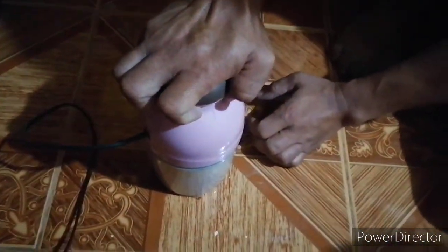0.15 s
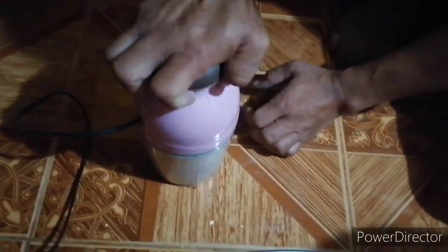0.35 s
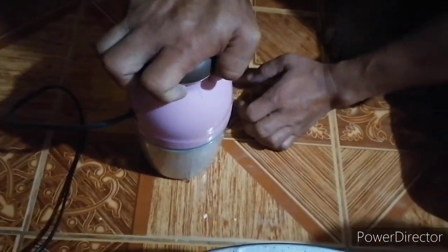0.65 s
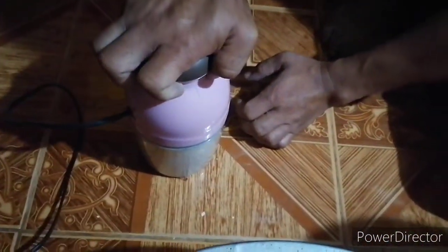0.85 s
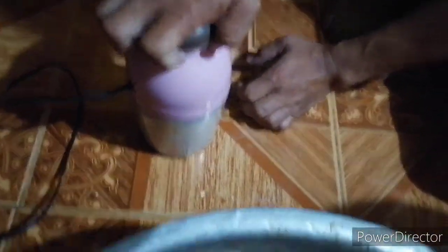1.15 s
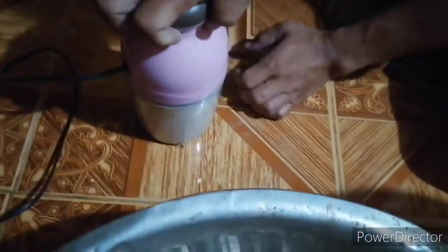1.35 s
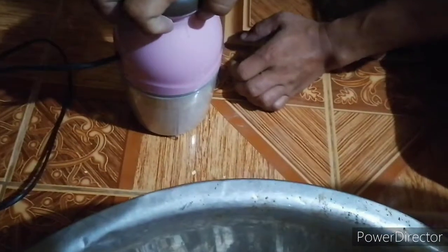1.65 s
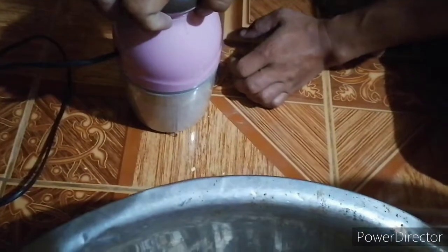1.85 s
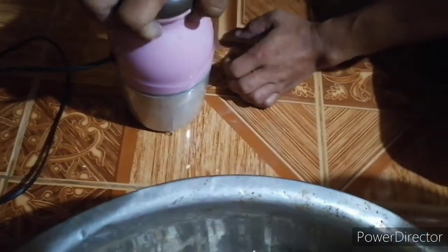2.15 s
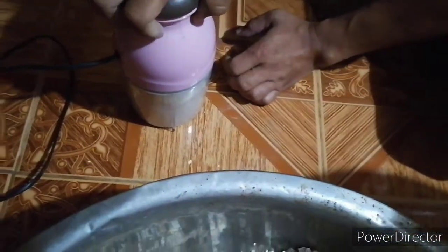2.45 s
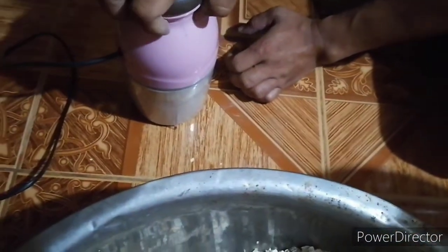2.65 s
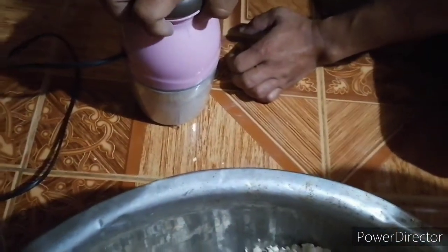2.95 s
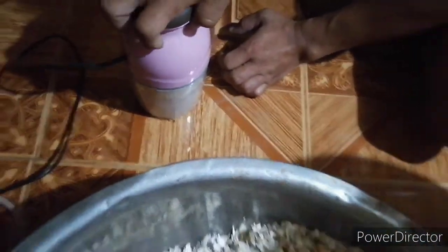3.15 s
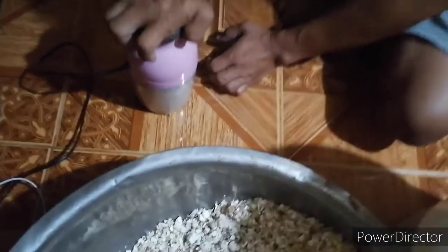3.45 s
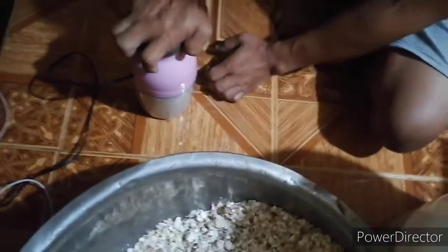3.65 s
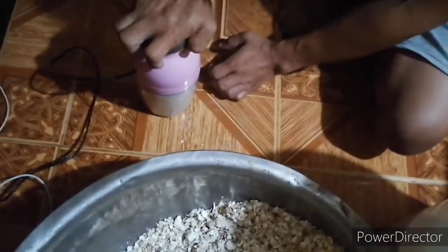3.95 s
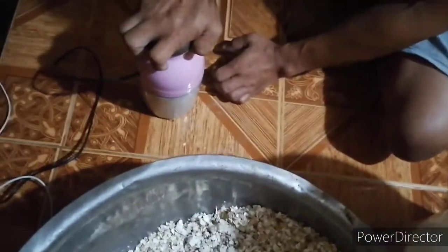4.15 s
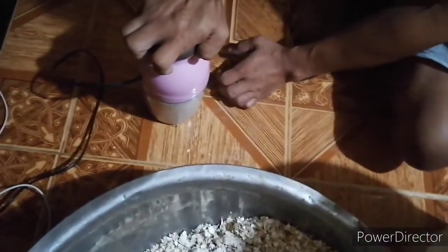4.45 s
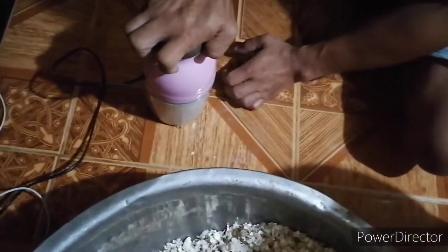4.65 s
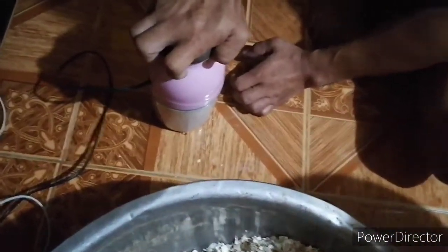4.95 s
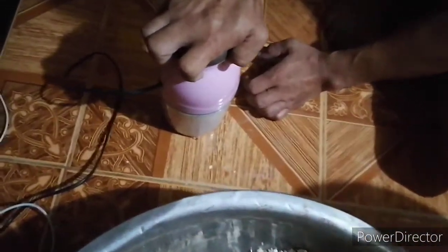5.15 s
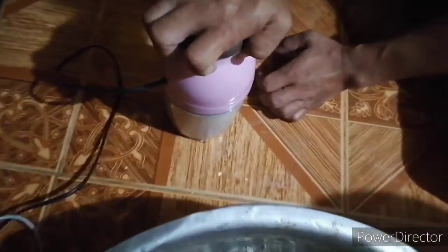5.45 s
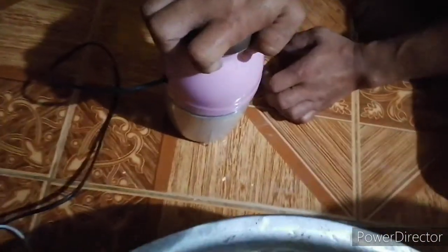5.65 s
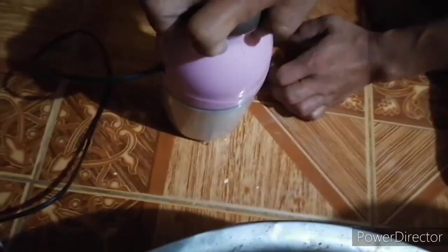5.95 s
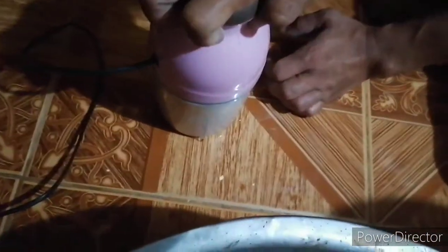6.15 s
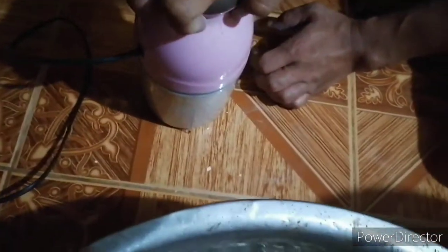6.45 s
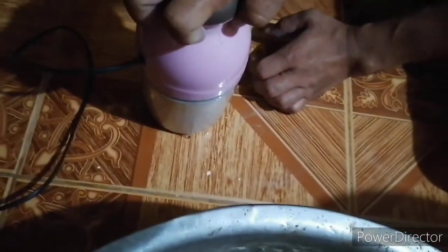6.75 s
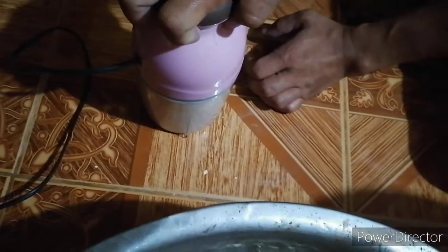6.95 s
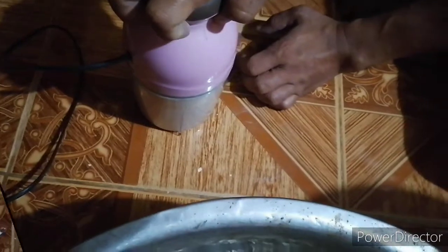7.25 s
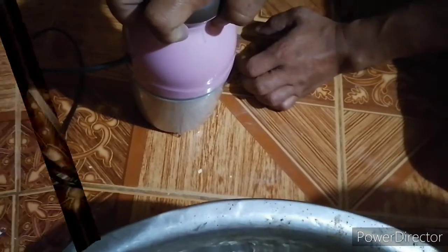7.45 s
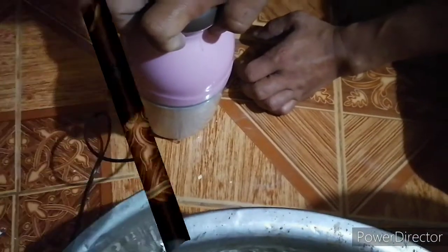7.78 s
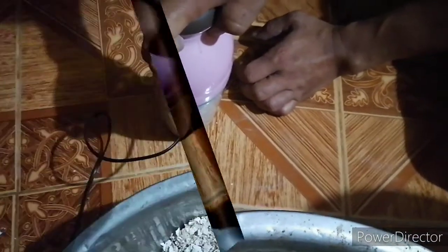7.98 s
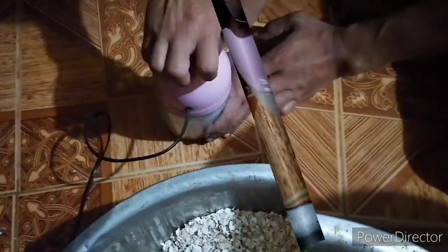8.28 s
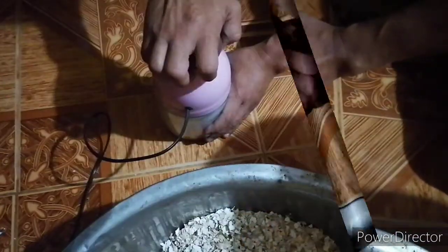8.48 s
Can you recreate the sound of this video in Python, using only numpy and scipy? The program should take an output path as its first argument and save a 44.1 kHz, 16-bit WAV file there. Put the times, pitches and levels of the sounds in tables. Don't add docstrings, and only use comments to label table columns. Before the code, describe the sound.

A small blade grinder rattles harshly with brittle shell bits in two bursts, a quiet pause with faint powder hiss between, then cuts off abruptly.

```python
import sys
import numpy as np
from scipy import signal
from scipy.fft import rfft, irfft, next_fast_len
from scipy.io import wavfile
from scipy.ndimage import uniform_filter1d, minimum_filter1d

SR = 44100
rng = np.random.default_rng(int(sys.argv[2]) if len(sys.argv) > 2 else 0)


def boost_factor(decibels):
    exponent = np.asarray(decibels, float) / 20
    return 10 ** exponent


def file_out(sig):
    cols = np.atleast_2d(sig).T
    lim = np.clip(cols, -1, 1)
    pcm = np.round(lim * 32767).astype(np.int16)
    wavfile.write(sys.argv[1], SR, pcm)


N = 380141
SIZE = next_fast_len(N + SR)
HZ = np.maximum(np.arange(SIZE // 2 + 1) * SR / SIZE, 1)
SWITCH_OFF_S, SWITCH_ON_S = 2.325, 3.3125

# time_s [s], rattle_db [dB], left_right_db [dB]
NEARNESS = [
    (0, -33.5, -1),
    (1.3, -33, -1.5),
    (2.3, -33, -1.5),
    (3.45, -36, -1.5),
    (4.2, -37, -2.5),
    (4.75, -35, -2.5),
    (6.3, -33.5, -2.5),
    (6.6, -33.5, -2.5),
    (8.2, -33.5, -3.5),
]


def grinder():
    near_db, pan_db = in_time(NEARNESS)
    colour_db = cup_colour()
    cracks = knocks(colour_db)
    cup = cracks + tumbling_load(colour_db, near_db)
    sides = np.array([[.5], [-.5]])
    return microphones(room(cup) + cracks) * boost_factor((pan_db + 3.5) * sides)


# pitch_hz [Hz], level_db [dB per Hz]
RATTLE = [(18, -60), (30, -45), (69, -30), (113, -13.5), (396, -11), (463, -4), (759, -5), (1040, -5),
          (1460, -5), (2100, 0), (3100, -4.5), (4580, -7), (6960, -6), (9260, -9.5), (15200, -10)]
# pitch_hz [Hz], width_hz [Hz], lift_db [dB]
RESONANCES = [(309, 7, 8), (461, 16, 2), (510, 20, -1), (595, 43, 4), (644, 15, 2.5), (374, 31, -0.5),
              (564, 16, -1.5), (757, 35, -6), (1870, 35, 1), (1042, 250, 4.5), (2137, 52, 2),
              (2630, 96, 2.5), (3097, 510, 6), (5790, 1600, 7.5), (7100, 680, 9.5), (1020, 7.9, 4.5)]


def cup_colour():
    colour_db = at_hz(RATTLE)
    for hz, width_hz, lift_db in RESONANCES:
        colour_db = colour_db + lift_db / (1 + (2 * (HZ - hz) / width_hz) ** 2)
    return colour_db


# start_s [s], peak_db [dB]
KNOCKS = [
    (0.1037, -21),
    (1.0544, -22),
    (3.3134, -31.5),
    (3.345, -28),
    (3.4136, -24),
    (3.4674, -25),
    (3.7504, -24),
    (7.2888, -22),
]


def knocks(colour_db):
    pushes = np.zeros(N)
    starts = [round(start_s * SR) for start_s, _ in KNOCKS]
    pushes[starts] = boost_factor(np.array(KNOCKS)[:, 1] + 6.5)
    return shaped(pushes, rms_one(boost_factor(colour_db)))


# time_s [s], lift_db [dB]
SURGES = [(.1, 1), (1.0, 2), (1.63, 2), (3.42, 1), (3.49, -1), (3.77, 1.5), (4.61, 2.5), (6.72, 1.5),
          (7.37, 1.5), (7.87, 1.5), (8.15, 2.5)]


def tumbling_load(colour_db, near_db):
    surge_half_s = 0.024
    bite_db, bite_s = -5, .05
    boom_db, dust_db = -10.5, -11
    boom_follows, dust_follows = .1, .1
    low = 1 / (1 + (HZ / 1600) ** 6)
    high = 1 / (1 + (8300 / HZ) ** 12)
    surge_db = sum(lift_db * hump(s, surge_half_s) for s, lift_db in SURGES)
    t = np.arange(N) / SR
    running = (t < SWITCH_OFF_S) | (t > SWITCH_ON_S)
    load_db = near_db + bite_db * np.exp(-np.abs(t - SWITCH_ON_S) / bite_s)
    swell = drift(48)
    layers = [(low, load_db + boom_db + boom_follows * surge_db, 2.5, 1.2),
              (1 - low - high, load_db + surge_db, 3.5, 1.8),
              (high, load_db + dust_db + dust_follows * surge_db, 3.0, 1.8)]
    load = 0
    for share, level_db, spread_db, clump_db in layers:
        body = rms_one(boost_factor(colour_db) * np.sqrt(np.clip(share, 0, 1)))
        load = load + shaped(fragments(level_db + 0.5, running, spread_db, clump_db, swell), body)
    return load


def fragments(level_db, running, spread_db, clump_db, swell):
    hits_per_s = 5000
    sizes = boost_factor(spread_db * np.minimum(rng.exponential(1, N), 4.0)) * rng.choice([-1, 1], N)
    hits = rms_one(sizes * (rng.random(N) < hits_per_s / SR))
    clumps = swell + 0.3 * drift(31.0) + 0.92 * drift(80)
    clumps -= uniform_filter1d(clumps, size=SR // 7)
    return hits * running * boost_factor(level_db + clump_db * 1.09 * np.tanh(clumps / 1.2))


HOP, SHORT = 768, 16384
SHORT_HZ = np.maximum(np.arange(SHORT // 2 + 1) * SR / SHORT, 1)
# pitch_hz [Hz], decay_s [s]
ROOM_T60 = [(100, .24), (600, .25), (1300, .25), (2200, .39), (3300, .26), (5500, .24), (12000, .22)]


def room(x):
    direct_db = -7
    t = np.arange(SHORT - 2 * HOP) / SR
    centres = 100 * 2 ** np.arange(0, 8, .75)
    decays = boost_factor(-60 * t / at_hz(ROOM_T60, centres)[:, None]) * (t > .004)
    decays /= np.sqrt(np.sum(decays ** 2, axis=1, keepdims=True))
    bands_away = np.log2(np.maximum(SHORT_HZ, 100) / centres[:, None]) / .75
    shares = np.cos(np.pi / 2 * np.clip(bands_away, -1, 1))
    spots = []
    for noise in rng.standard_normal((40, 2, 2, len(t))):
        tails = sum(rfft(noise[k % 2] * decays[k], SHORT) * shares[k] for k in range(len(centres)))
        spots.append(pair(*tails, SHORT_HZ) + boost_factor(direct_db))
    run_in = 12 * HOP
    padded = np.pad(x, (run_in, 2 * HOP), "reflect")
    fade = np.sin(np.pi * np.arange(2 * HOP) / (2 * HOP))
    out = np.zeros((2, N + 2 * SHORT))
    for k, start in enumerate(range(0, N + run_in, HOP)):
        piece = rfft(padded[start:start + 2 * HOP] * fade, SHORT)
        out[:, start:start + SHORT] += irfft(piece * spots[k % 40], SHORT)
    return out[:, run_in:run_in + N]


# pitch_hz [Hz], left_right_db [dB]
TILT = [(60, -11), (120, 2), (240, -1.5), (480, 4), (950, -1.5), (1890, -4), (3770, -6), (7520, -0.5),
        (15000, -1.5)]
# pitch_hz [Hz], lead_rad [radians]
LEAD = [(0, 0), (950, .9), (1210, 1.2), (3010, 10.0), (7060, 25.5), (16000, 56)]


def microphones(x):
    sides = np.array([[.5], [-.5]])
    lead_rad = np.interp(HZ, *np.transpose(LEAD))
    return shaped(x, boost_factor(at_hz(TILT) * sides) * np.exp(1j * lead_rad * sides))


# pitch_hz [Hz], level_db [dB per Hz]
HISS_COLOUR = [(4300, -41), (5000, -17), (5700, -22), (6500, -6.5), (7050, -1), (7900, -11), (9500, -16.5),
               (12000, -19), (15200, -21.5)]


def powder_hiss():
    peak_s, peak_db = 3.1, -49.5
    rise_s, sag_db, sag_s = .052, 5, .07
    since = np.arange(N) / SR - peak_s
    rise = -10 * (since / rise_s) ** 2
    sag = -sag_db * (1 - np.exp(-np.abs(since) / sag_s))
    level_db = peak_db + np.where(since < 0, rise, sag)
    before_blade = since < SWITCH_ON_S - peak_s
    return wide_noise(HISS_COLOUR) * boost_factor(level_db + 4.5 + 1.3 * drift(44)) * before_blade


# time_s [s], level_db [dB], half_length_s [s]
BUMPS = [
    (2.603, -76, .04),
    (2.743, -62, .012),
    (2.814, -63, 0.037),
    (2.93, -78, .03),
]


def hand_rumble():
    grip = boost_factor(-77.5) + sum(boost_factor(db) * hump(s, half_s) for s, db, half_s in BUMPS)
    colour = [(8, -35), (25, -5.5), (60, -1.5), (110, -4.5), (300, -25), (700, -56)]   # (Hz, dB per Hz)
    return wide_noise(colour) * grip * boost_factor(-3.0 + 1.2 * drift(20))


# pitch_hz [Hz], level_db [dB per Hz]
QUIET = [(20, -13), (60, -20.5), (190, -18.5), (330, -18.5), (470, -18), (620, -22.5), (1100, -27),
         (3200, -24.5), (4300, -30), (5800, -24.5), (7050, -23.5), (8300, -35.5), (11000, -38),
         (15200, -37)]


def room_tone():
    quiet_db = -63.5
    return wide_noise(QUIET) * boost_factor(quiet_db - 4.5)


def wide_noise(colour):
    mid, side = rfft(rng.standard_normal((2, SIZE)))
    return rms_one(irfft(pair(mid, side) * boost_factor(at_hz(colour)), SIZE)[:, :N])


# pitch_hz [Hz], likeness [0-1]
LIKENESS = [(30, .62), (70, 0.4), (130, 1), (330, 0.6), (520, 0.82), (900, 0.3), (1600, 0), (15000, 0)]


def pair(mid, side, grid=HZ):
    alike = np.clip(at_hz(LIKENESS, grid), 0, 1)
    return np.sqrt((1 + alike) / 2) * mid + np.sqrt((1 - alike) / 2) * side * np.array([[1], [-1]])


def drift(rate):
    r = np.exp(-80 * np.pi * rate / SR)
    slow = signal.lfilter([1], [1, -2 * r, r * r], rng.standard_normal(N // 40 + 2002))[2000:]
    return np.interp(np.arange(N) / 40, np.arange(len(slow)), rms_one(slow))


def hump(centre_s, half_s):
    return np.exp(-((np.arange(N) / SR - centre_s) / half_s) ** 2)


def in_time(rows):
    s, *columns = np.transpose(rows)
    return [np.interp(np.arange(N) / SR, s, c) for c in columns]


def at_hz(points, grid=HZ):
    hz, value = np.transpose(points)
    return np.interp(np.log(grid), np.log(hz), value)


def shaped(x, response):
    return irfft(rfft(x, SIZE) * response, SIZE)[..., :N]


def rms_one(x):
    return x / np.sqrt(np.mean(np.abs(x) ** 2) + 1e-20)


def scene():
    return grinder() + powder_hiss() + room_tone() + hand_rumble()


def dropouts(x, weak_db, masked_db):
    hz, _, cells = signal.stft(x, SR, "cosine", 2048, 1024)
    power = np.mean(np.abs(cells) ** 2, axis=0) + 1e-30
    narrow = uniform_filter1d(power, size=14, axis=0)
    broad = uniform_filter1d(power, size=60, axis=0)
    whim_db = 5.0 * uniform_filter1d(rng.standard_normal(power.shape), size=14, axis=0)
    weak = (narrow < broad * boost_factor(2 * (weak_db + whim_db))) & (hz[:, None] > 9300)
    loudest = broad[hz > 3000].max(axis=0)
    masked = (narrow < loudest * boost_factor(2 * masked_db)) & (hz[:, None] > 900)
    keep = minimum_filter1d(1. - (weak | masked), size=10, axis=0)
    keep = minimum_filter1d(keep, size=2, axis=1)
    return signal.istft(cells * keep, SR, "cosine", 2048, 1024)[1][:, :N]


def roll_off(x):
    return signal.sosfilt(signal.butter(12, 16430, fs=SR, output="sos"), x)


def record(dry):
    stop_s, faint_end_s = 8.1815, 8.6
    t = np.arange(N) / SR
    wisp = boost_factor(-19 - 1000 * (t - stop_s)) * (t < stop_s + .016)
    rumble = wide_noise([(20, 0), (250, -4), (700, -40), (15000, -50)]) * boost_factor(-87.0)
    fizz = wide_noise([(20, 0), (15000, 0)]) * boost_factor(-74 + 1500 * (t - N / SR))
    heard = dropouts(dry, weak_db=-3.6, masked_db=-30.8)
    mix = heard * np.where(t < stop_s, 1, np.minimum(wisp, 1))
    mix = mix + (rumble + fizz) * (t > faint_end_s)
    mix = signal.sosfilt(signal.cheby2(24, 50, 15310, fs=SR, output="sos"), mix)
    return roll_off(mix)


dry = scene()
out = record(dry)
file_out(out)
```